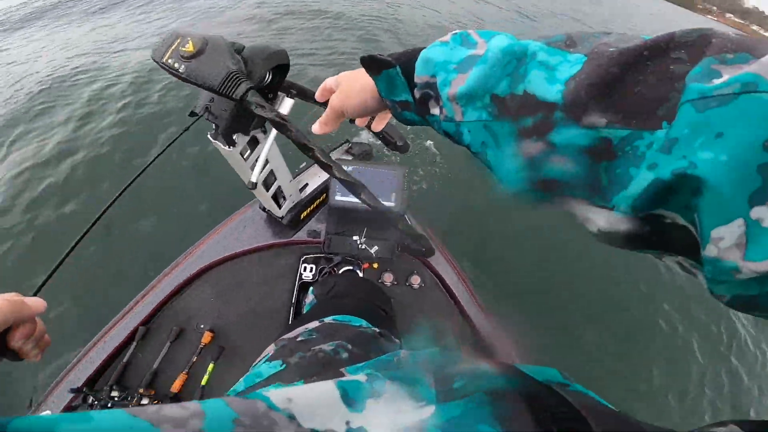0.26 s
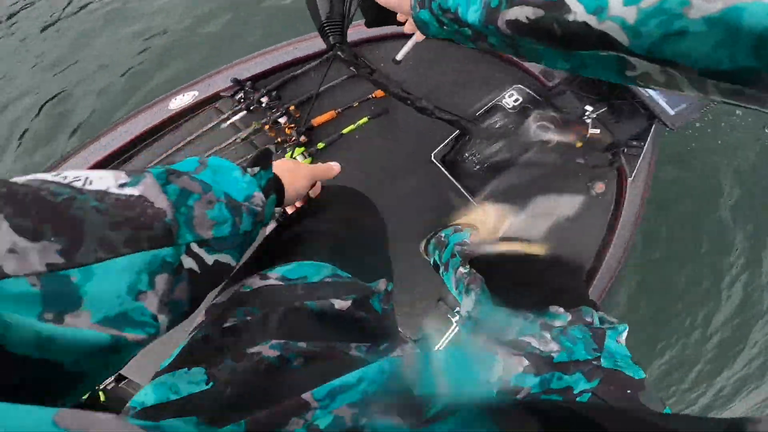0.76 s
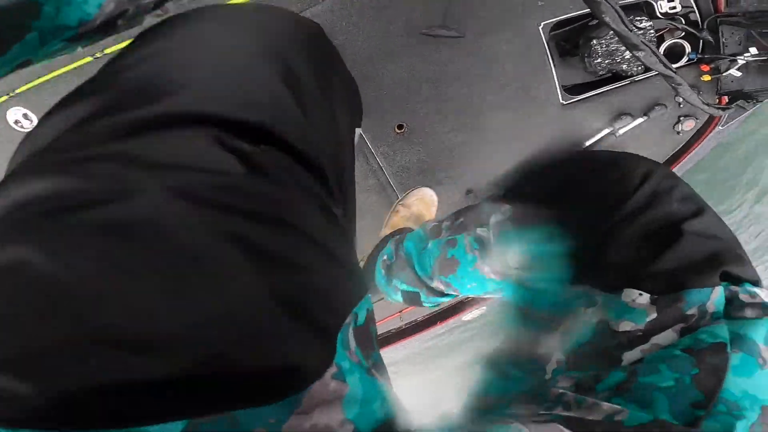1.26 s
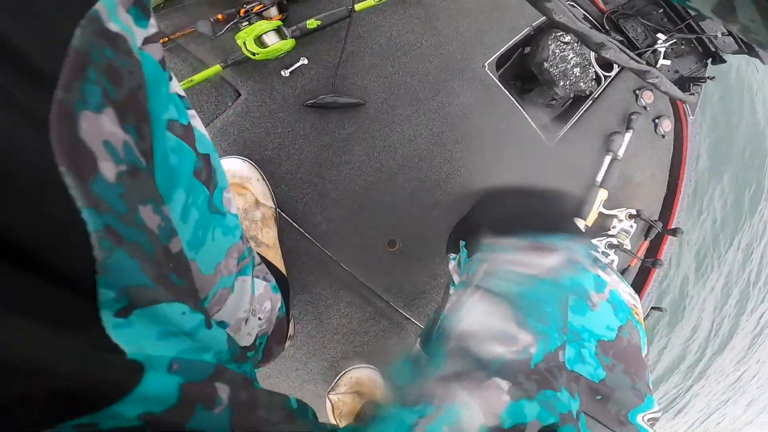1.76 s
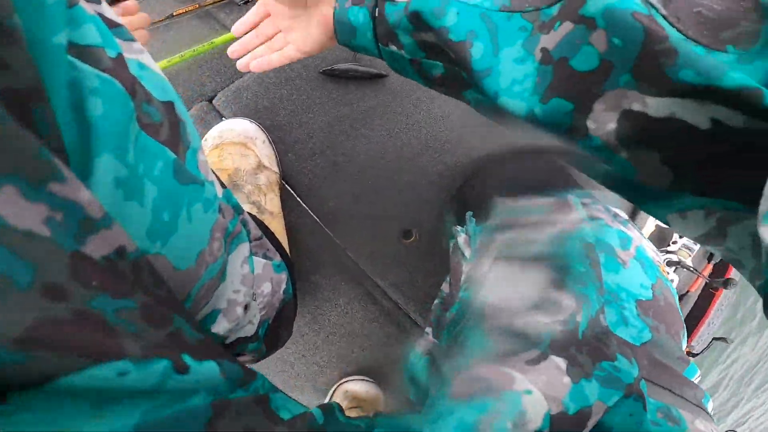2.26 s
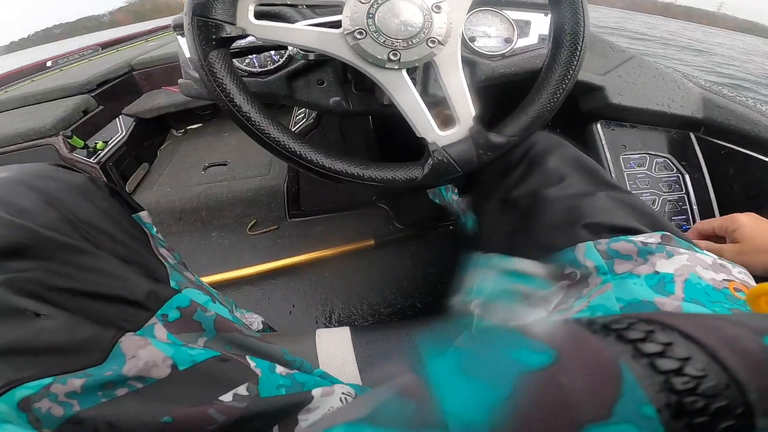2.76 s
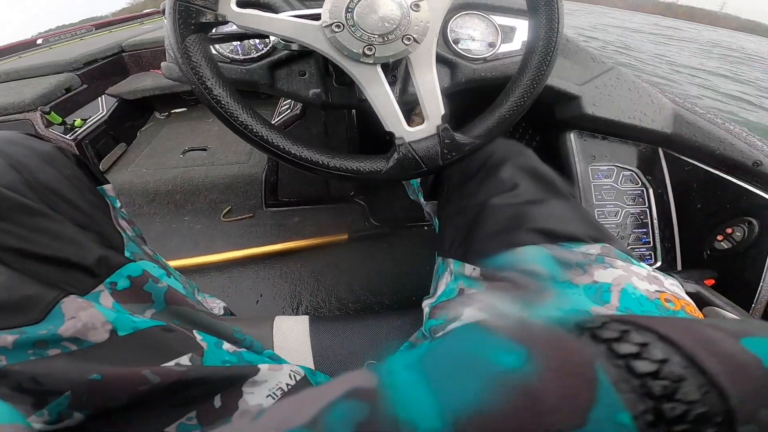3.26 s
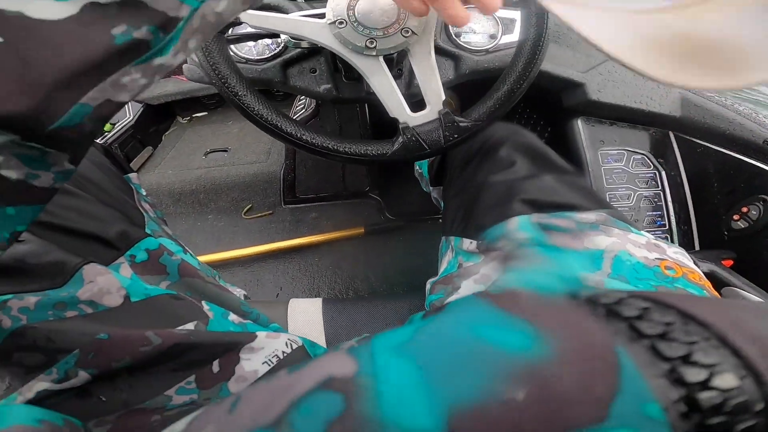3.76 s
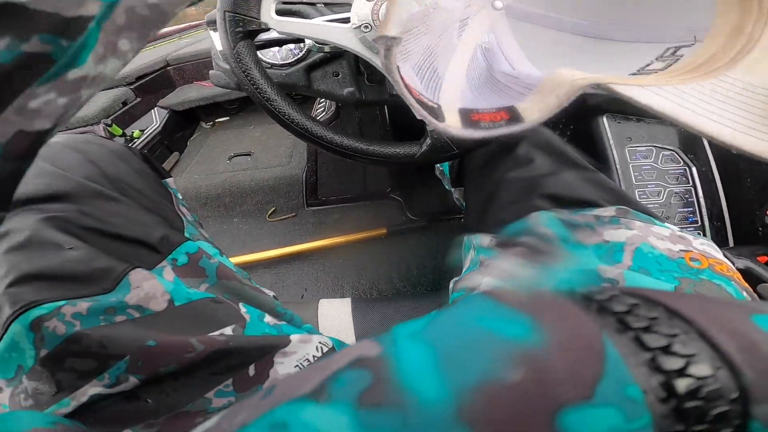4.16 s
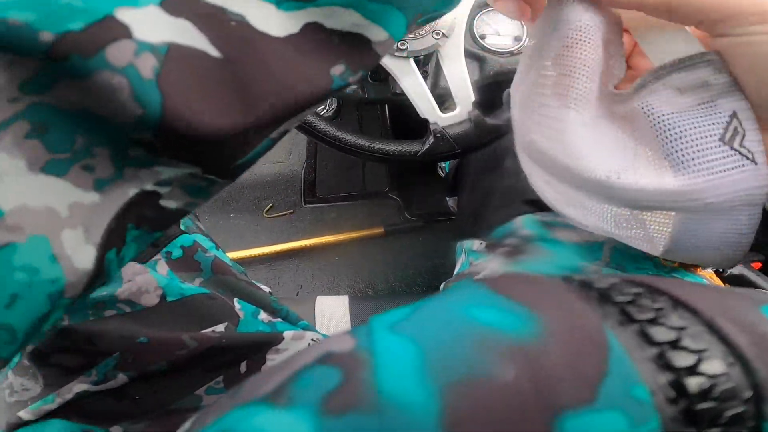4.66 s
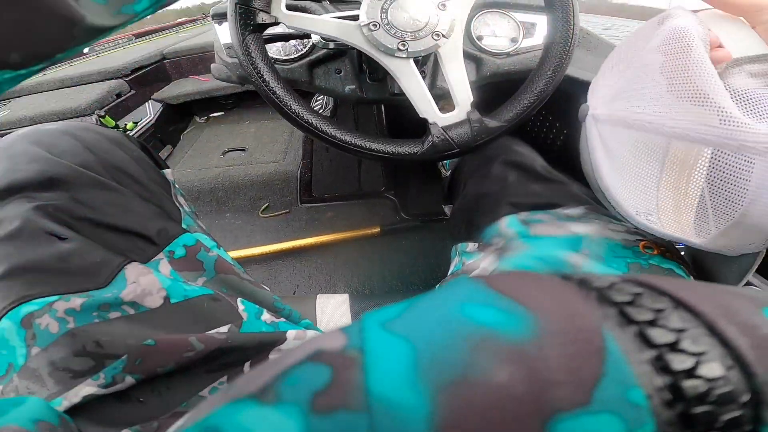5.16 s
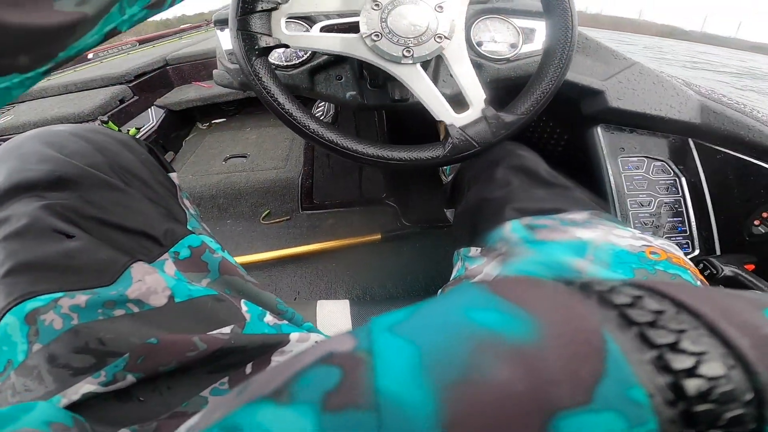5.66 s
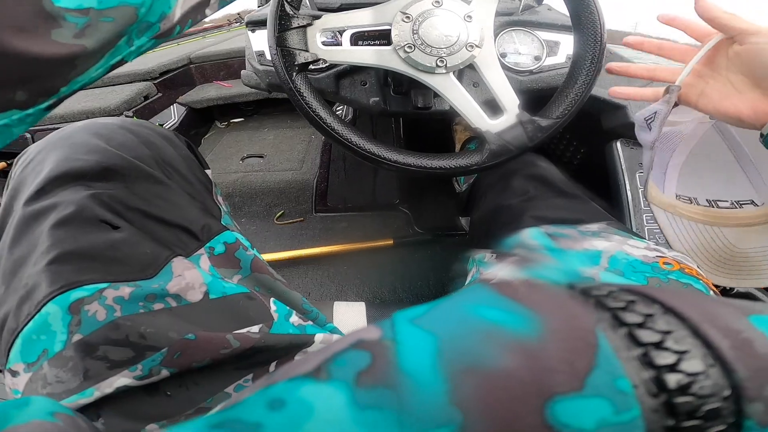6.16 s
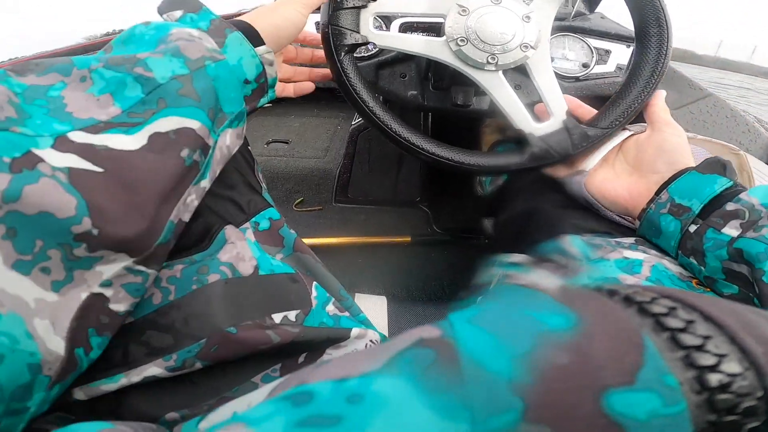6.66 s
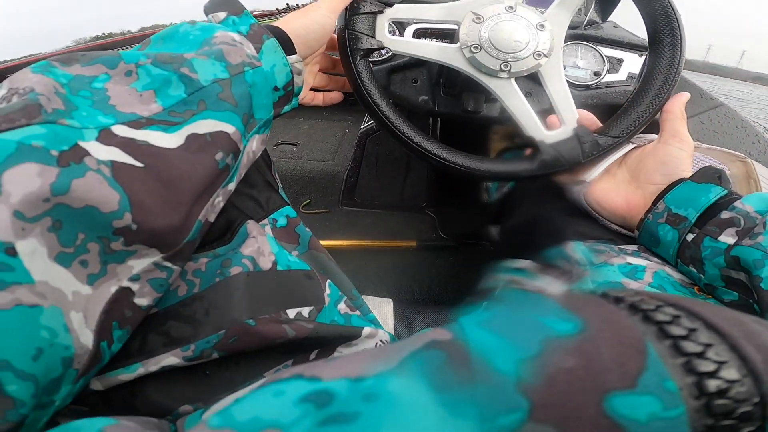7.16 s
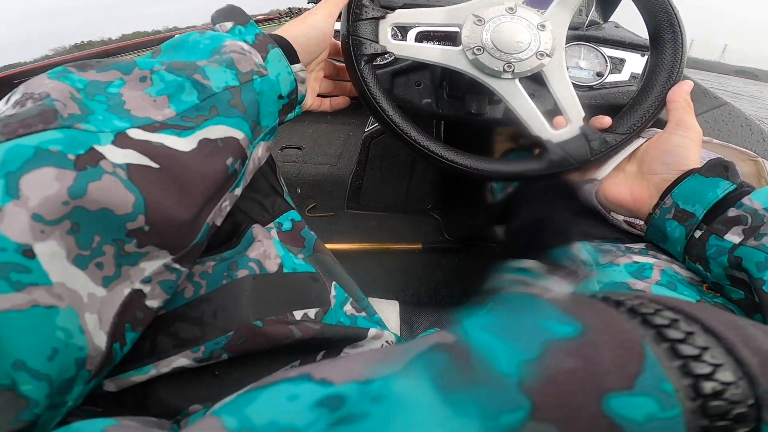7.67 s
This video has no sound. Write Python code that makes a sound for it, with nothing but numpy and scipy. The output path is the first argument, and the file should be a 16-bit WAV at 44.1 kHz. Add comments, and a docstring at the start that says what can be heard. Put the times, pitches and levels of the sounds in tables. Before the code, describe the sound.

Heard from the driver's chest in stereo on a boat on open water. From 0 to 0.5 s, light clacks and low hull knocks under close jacket rustle and a faint hum. At 0.52 s a hard bright clack starts a dense clatter until about 0.9 s, with heavy hollow thumps, short gritty scrapes and rattling loose gear. Another deep thump lands near 1.3 s, then mostly cloth rustle and a sharp knock at 2.1 s. Between 2.35 and 2.75 s he drops into the seat with booming thuds and console knocks. From 3.2 to 3.8 s the outboard sweeps up quickly with a brief intake whine and low shudder, then holds a throbbing hum. From 4.5 to 5.1 s it surges again, harder and brighter, then creeps higher into a steady drone, with growing wind, hull rumble and wash. Small ticks occur near 5.9 and 7.4 s; it is still running at the end.

```python
"""A fibreglass fishing boat on a lake, heard by a stereo microphone on the driver's chest.
First the bow motor is stowed: ringing modes make clacks and hull thumps, with gritty scrapes and a faint hum.
He steps down and sits with knocks of the console, his jacket rustling in bursts of crackling noise.
Then the six-cylinder outboard speeds up in two steps: firing tones and propeller throb sweep through
hull resonances over an intake whine, while noise of wind, hull rumble and wash grows with engine speed."""
import sys
import numpy as np
from scipy import signal
from scipy.fft import rfft, irfft, next_fast_len
from scipy.io import wavfile

SR = 44100
rng = np.random.default_rng(int(sys.argv[2]) if len(sys.argv) > 2 else 0)


def digitize_waveform(pressure):
    """Quantize a signal to 16-bit integers and store it at the path in sys.argv[1].

    Rows of a 2-D input are taken as channels; values are limited to [-1, 1].
    """
    field = np.atleast_2d(pressure).T
    bounded = np.clip(field, -1, 1)
    quanta = np.round(bounded * 32767).astype(np.int16)
    wavfile.write(sys.argv[1], SR, quanta)


N = 348831
TIME = np.arange(N) / SR

# How much the two microphone ports differ: (frequency [Hz], side minus mid [dB])
PORT_WIDTH = [(30, -20), (80, -29), (160, -33), (350, -20.5), (700, -9), (1400, -6.5), (2800, -3),
              (5000, 0.5), (12000, 0)]
PORT_LAG = 4  # samples by which the left port hears boat and engine later
TOP_HZ = 15300  # upper limit of the microphone chain

# Two faint tones aboard:
# (time [s], lower tone [Hz], its level [dB], upper tone [Hz], its level [dB])
HUM_TONES = [(0, 121.1, -34.5, 292, -34.5), (.5, 126.4, -35, 291.5, -37), (1.05, 128, -43, 282.7, -50),
             (1.55, 101, -41, 284, -48.5), (2.0, 105.8, -44.5, 247.5, -41.5), (2.4, 110, -29.5, 281, -39),
             (2.95, 111.1, -40, 278.3, -38.5), (3.3, 112.5, -34.5, 270, -47)]

# Noise colours of wind on the ports, drumming hull and wash: (frequency [Hz], relative level [dB])
BUFFET_SPECTRUM = [(12, -13), (24, -8), (36, -2.5), (55, -3.5), (90, -5.5), (200, -34.5)]
RUMBLE_SPECTRUM = [(30, -12.5), (60, -7.5), (110, -1), (180, -1), (250, -4), (330, -6), (450, -9.5),
                   (530, -20.5), (800, -27.5), (1400, -39)]
WASH_SPECTRUM = [(250, -10.5), (500, 7), (700, 6), (930, 2), (1150, -1.5), (1450, -3.5), (1850, -11.5),
                 (2600, -15), (3200, -16), (3500, -15), (3900, -19.5), (5000, -24.5), (8000, -35.5)]
UNDER_WAY_HZ = 47.7  # firing rate above which the boat gathers way
# Noises that grow with speed: (relative level until under way [dB], gain per octave of engine speed [dB])
BUFFET_LAW = (-43, 8.6)
RUMBLE_LAW = (-42.5, 6.07)
WASH_LAW = (-52.5, 7.25)
FLUTTER_LAW = (-73.5, 7.3)  # the jacket in the headwind
FLUTTER_PAN_DB = 5.5  # left minus right
# Low rumble and soft wash swell as the driver moves, later as the boat runs:
# (middle [s], length [s], low buffet, rumble, wash: relative levels [dB])
NOISE_SWELLS = [(0.204, 0.86, -60, -35, -46), (0.716, 0.33, -27, -40, -42.5), (2.16, 0.58, -64, -38.5, -47),
                (2.473, 0.24, -44, -27, -41.5), (2.798, 0.9, -31.5, -40.5, -49),
                (3.671, 0.49, -29, -32, -46), (4.056, 1.8, -45, -40.5, -46), (4.636, 0.39, -36, -39, -43.5),
                (5.601, 1.5, -39.5, -27.5, -62), (6.95, 0.2, -30.5, -34, -45),
                (7.756, 0.53, -44, -48, -39.5)]
# The hull shudders as the propeller bites: (middle [s], length [s], frequency [Hz], level [dB])
SHUDDER = (3.5, 0.2, 34, -15.5)

# Colour of the jacket's rustle: (frequency [Hz], relative level [dB])
RUSTLE_SPECTRUM = [(290, -30), (500, 12), (665, -9), (714, -17.5), (766, -0.5), (871, -10.5), (1210, 1.5),
                   (1500, -3.5), (1630, -3.5), (2720, -4), (6860, -12), (13600, -31), (15000, -45)]
# Arms and body moving in the jacket:
# (middle [s], length [s], relative rustle level [dB], left minus right [dB])
JACKET_MOVES = [(0.197, 0.67, -44, 1.5), (0.726, 0.22, -41.5, 1), (0.947, 0.12, -44, 7.5),
                (1.064, 0.067, -46.5, 8), (1.254, 0.24, -42.5, 3), (1.518, 0.27, -50, 5),
                (1.763, 0.3, -44, 4), (2.05, 0.32, -48.5, 3), (2.268, 0.21, -43, 5),
                (2.536, 0.054, -45, -5), (2.7, 0.55, -53, 5.5), (3.425, 0.45, -54.5, 2.5),
                (3.728, 0.34, -48.5, 7.5), (4.352, 0.23, -56.5, 11), (5.018, 0.11, -51.5, 9.5),
                (5.19, 0.26, -50.5, 8.5), (5.85, .6, -59, 1.5), (6.492, 0.41, -54, 3),
                (6.714, 0.2, -47.5, 5), (7.75, 0.62, -63, 4)]

# Ringing modes of hard fittings, seat and console, hull and deck:
# (frequency [Hz], relative level [dB], t60 [s])
FITTING_MODES = [(547, 16.5, 0.021), (774, 14, 0.012), (947, -5.5, 0.073), (1470, 2.5, 0.019),
                 (1680, -8, 0.019), (2180, -8.5, 0.018), (2490, -6, 0.02), (3020, 1, 0.026),
                 (3330, -3, 0.017), (4480, 11, 0.0059), (4770, -2.5, 0.03), (6920, -9, 0.029),
                 (7620, -27, 0.015), (9650, -9.5, 0.045)]
CONSOLE_MODES = [(800, 7, 0.066), (897, 6, 0.068), (1240, -0.5, 0.064), (1400, -5, .035), (2300, -8, 0.031),
                 (2700, -10, 0.022), (3400, -4, 0.045), (4300, -8, 0.033)]
HULL_MODES = [(32.24, 4, 1), (57.5, -3.5, 1), (87.8, 0, 0.37), (115.6, -0.5, 0.15), (145.5, 4, 0.23),
              (188, -2, 0.41), (218.6, -1.5, 0.14), (277, 6, 0.082), (336, 2.5, 0.076), (397, -0.5, 0.13),
              (501, 2, 0.073), (599, -1.5, 0.071), (693, -14, 0.22)]
# Clacks and knocks, with a bright cloth tick and a few faint stray ticks:
# (time [s], peak level [dB], colour [Hz], ring length [share of t60], pitch [factor])
CLACKS_AND_TICKS = [(.092, -23, 1070, .6, 1.2), (.311, -15, 1630, 1.7, 0.93), (.39, -27, 1400, 1.3, 1.03),
                    (.449, -29, 5100, 1, 1), (.520, -4.5, 1650, 1, 1), (.5222, -11, 2890, 0.66, 1),
                    (.5235, -23, 1510, 0.6, 1.2), (.5637, -16, 950, 0.55, 0.88),
                    (.598, -18.5, 644, 1.5, 0.95), (.604, -21, 1600, 0.95, 1.3),
                    (.6246, -7.5, 1360, 1.6, .93), (.627, -18, 2100, .6, 0.8),
                    (.6365, -10.5, 3380, 0.33, 1.02), (.6435, -25, 3600, .7, 1.2),
                    (.650, -21, 2300, .7, 0.93), (.655, -23, 1800, .8, 0.89), (.668, -22, 1160, 1, 0.87),
                    (.671, -26, 4500, .8, 1.05), (.696, -19.5, 1570, 2.9, 0.96), (.707, -32, 750, 1, 1.1),
                    (.7265, -20, 3300, 0.45, 1.2), (.729, -27, 1300, .77, 1.1), (.741, -14, 2700, .8, 1.4),
                    (.7445, -21, 4300, .7, 1), (.751, -16, 1800, 1.2, 0.94), (.762, -14, 1600, 1.6, 1),
                    (.785, -23, 593, .9, 0.62), (.808, -24, 1760, 1.6, 0.96), (.811, -31, 4400, 0.92, 1.23),
                    (.827, -32, 2600, 0.99, 0.74), (.8445, -30, 3480, 1, 1.15),
                    (.848, -21, 1700, 1.5, 1.12), (.904, -21, 1220, 1.2, .95), (1.105, -27, 990, 1, 1.1),
                    (1.1705, -31, 7000, 0.72, 1.08), (1.237, -22.5, 1120, 1.8, 1.14),
                    (1.285, -20, 2300, 0.75, 0.85), (1.369, -32, 3740, .9, 1.2),
                    (1.432, -34, 1700, 0.63, 1.4), (1.794, -23, 1210, 0.58, 1.05),
                    (2.098, -17, 1030, .22, 1.2), (2.1027, -7, 1360, 0.21, 0.73),
                    (4.956, -30, 1110, 0.66, 0.76), (5.87, -24.5, 1090, 0.61, 0.8),
                    (7.3855, -24.5, 1648, 0.79, 1.12), (7.4424, -16.5, 1260, 0.64, 1.0)]
# Knocks as he drops into the seat, same columns:
# (time [s], peak level [dB], colour [Hz], ring length [share of t60], pitch [factor])
SEAT_KNOCKS = [(2.362, -21, 700, 0.62, 0.69), (2.373, -23, 1350, 1.2, 1.08), (2.464, -25, 900, 0.64, 1.15),
               (2.4898, -13.5, 800, 1.26, 1.03), (2.4965, -23, 1000, 0.43, 1.26), (2.539, -29, 3400, .8, 1),
               (2.7455, -19, 1970, 0.95, 1.02), (2.99, -30, 800, 0.78, 0.99)]
# Thumps on the hull: (time [s], peak level [dB], colour [Hz], ring length [share of t60])
HULL_THUMPS = [(.026, -13.5, 198, 0.57), (.24, -18.5, 225, 2.7), (.312, -13, 212, 0.52),
               (.529, -10, 100, 0.66), (0.601, -14.5, 140, 2.6), (.637, -9.5, 188, 0.93),
               (.647, -2.5, 172, 0.08), (.726, -3, 168, 0.37), (.738, -4, 190, 1.23), (.757, -8, 170, 1.1),
               (0.794, -4, 113, 0.76), (0.825, -7.5, 121, 0.29), (.855, -8.5, 85, 0.32),
               (1.285, -9, 203, 0.2), (1.289, -5, 75.5, 0.31), (1.312, -17, 150, 2), (1.36, -24, 200, 0.93),
               (1.391, -24, 330, 0.6), (1.424, -32, 600, 0.53), (2.105, -18, 79.5, 0.34),
               (2.348, -8.5, 368, 0.44), (2.361, -10, 605, 0.45), (2.375, -17, 380, 0.87),
               (2.493, -6.5, 148, 0.99), (2.511, -3, 45.3, 0.55), (2.555, -9, 55, 1.2),
               (2.746, -7, 214, 1.05)]
# Gritty scrapes that go with the blows: (time [s], level [dB], t60 [s], colour [Hz])
GRITTY_SCRAPES = [(0.636, -16.5, 0.068, 1800), (0.661, -34, 0.32, 900), (0.728, -16.5, 0.095, 890),
                  (0.743, -24, 0.058, 2520), (0.752, -27, 0.12, 1500), (0.806, -32.5, 0.12, 2200),
                  (1.168, -32.5, 0.08, 5660), (1.236, -27.5, 0.033, 5970), (1.286, -20, 0.11, 664),
                  (1.288, -32.5, 0.16, 4500), (1.305, -32.5, 0.28, 550), (2.141, -36, 0.044, 6860),
                  (2.344, -32.5, 0.27, 610), (2.367, -34, 0.19, 1120), (2.484, -33, 0.09, 1300),
                  (2.495, -29.5, 0.048, 2400), (2.518, -39, .05, 11000), (2.536, -30.5, 0.06, 3600),
                  (2.746, -34, 0.06, 2200)]
# Loose gear answering a thump: level against the thump, longest delay, middle colour
RATTLE_DB, RATTLE_S, RATTLE_HZ = -25.5, 0.079, 2200

# Engine speed: (time [s], firing rate [Hz])
ENGINE_SPEED = [(3.1, 30.83), (3.2, 33), (3.34, 46.63), (3.42, 52.43), (3.48, 61.2), (3.54, 66.1),
                (3.63, 78.97), (3.72, 90.84), (3.8, 95.6), (3.97, 94.94), (4.2, 93.3), (4.45, 93.5),
                (4.57, 96.8), (4.66, 103.6), (4.75, 110.3), (4.83, 116.1), (4.91, 123.1), (5.07, 136.1),
                (5.2, 139), (5.39, 140.3), (5.55, 144.9), (5.71, 146.6), (6.03, 148.8), (6.19, 157.3),
                (6.58, 165.6), (6.88, 170), (7.04, 173.8), (7.3, 175.7), (7.56, 180.4), (7.75, 180.6),
                (7.91, 182.5)]
# Load on the drive, from going into gear to open throttle: (time [s], load [dB])
DRIVE_LOAD = [(2.3, -48), (2.6, -5), (3.08, -8), (3.2, -6), (3.5, -3), (3.7, -1)]
# Pushes of the throttle, which harden the exhaust note: (middle [s], length [s], push [dB])
THROTTLE_PUSHES = [(3.872, 0.36, 3), (4.405, 0.23, 5), (4.797, 0.1, 7), (5.034, 0.26, 13.5)]
CYLINDERS = 6
BLADES_PER_FIRING = 4 / 7  # blade passes per firing
# Harmonics of the firing rate: (multiple [of the firing rate])
FIRING_MULTIPLES = (1, 2, 3, 4, 5, 8, 10, 12)
# Each of those multiples: (strength [dB], share of a push [factor], loss per dB of lighter load [dB])
FIRING_STRENGTHS = [(1.5, 0, 0.52), (-3, 0.41, 1.84), (-11.5, 1, 2.5), (-5, 1, 1.2), (-14, .6, 6),
                    (-6.5, 0.54, 6.5), (-15.5, 0, 5.5), (-6.5, .4, 6)]
# Resonances of hull and cowling that the firing tones climb through:
# (centre [Hz], half width [Hz], level [dB])
HULL_BOOMS = [(35.4, 7.1, -19), (82.2, 8.7, -19), (93.7, 1.4, -26), (132.2, 9.5, -18), (172.1, 16.7, -14),
              (212, 26, -19.5), (339.5, 15, -21.5), (383.4, 10, -23.5), (410.3, 15, -22.5),
              (444, 12, -15.5), (467.4, 6, -19.5), (650.1, 6.9, -35), (693.4, 26, -27), (735, 9, -30.5),
              (757.8, 10, -21), (925, 35, -31.5), (1140, 19, -30.5), (1350, 50, -37.5), (1448, 12, -31.5),
              (1797, 48, -41)]
# Slow flexing of the hull, shaken by the propeller blades: (centre [Hz], half width [Hz], level [dB])
HULL_FLEXES = [(33, 8, -29), (64.4, 6.2, -17), (80.6, 4.9, -24), (85, 3.8, -17.5), (98.9, 2.2, -28)]
# What the hull passes on of the uneven firing: (frequency [Hz], gain [dB])
HULL_PATH = [(28, -5), (50, -7), (80, 1), (96, 13), (112, -3), (125, -3.5), (152, -1), (174, 14.5),
             (198, 2.5), (245, 1), (315, -6), (385, 0.5), (425, -7.5), (462, -0.5), (490, -8.5), (540, -23),
             (640, -18), (830, -21.5), (912, -11), (950, -20.5), (1000, -18), (1040, -18.5), (1130, -25),
             (1500, -35.5), (2000, -30)]
UNEVEN_DB, UNEVEN_PER_LOAD = -36, 3.06  # cylinder unevenness at 0 dB load; its dB per dB of load
# Whine of the air intake; its resonance rises as the throttle opens:
# (time [s], level [dB], resonance centre [Hz])
INTAKE_WHINE = [(2.3, -50, 937), (2.5, -42, 923), (2.8, -46.5, 948), (3.24, -50, 961), (3.34, -34, 932),
                (3.45, -37.5, 967.3), (3.68, -34.5, 986), (3.95, -55, 1015), (4.4, -62, 994)]
INTAKE_WIDTH_HZ = 32  # half width of the intake resonance
INTAKE_NOISE_DB, ONE_BANK_DB = -16, -11  # rushing air, and lines of one cylinder bank, against firing lines


def undb(db):
    """Decibels to gain."""
    return 10 ** (np.asarray(db) / 20)


def unit(x):
    """Scale to rms 1."""
    return x / np.sqrt(np.mean(x ** 2))


def curves(table):
    """The columns of a table, joined by straight lines in time."""
    s, *columns = np.transpose(table)
    return [np.interp(TIME, s, column) for column in columns]


def response(hz, points):
    """Gain of a drawn spectrum; it falls steeply beyond the ends."""
    f, db = np.transpose(points)
    octaves_outside = np.abs(np.log2((hz + 1) / np.clip(hz + 1, f[0], f[-1])))
    return undb(np.interp(np.log(hz + 1), np.log(f), db) - 20 * octaves_outside)


def focus(hz, centre_hz, octaves):
    """A rounded peak that favours the frequencies near one colour."""
    return 1 / (1 + (np.log2((hz + 1) / centre_hz) / octaves) ** 2)


def resonances(hz, peaks):
    """Gain of a set of resonances along a slowly moving frequency."""
    coarse = hz[::32]  # slow enough to work out every 32nd sample
    power = 0
    for centre, width, db in peaks:
        power = power + (undb(db) / (1 + ((coarse - centre) / width) ** 2)) ** 2
    return np.interp(TIME, TIME[::32], np.sqrt(power))


def walk(rate):
    """Smooth random wander with a spread near 1, drawn at rate points per second."""
    steps = rng.standard_normal(int(N / SR * rate) + 2)
    fine = signal.resample_poly(steps, 8, 1)
    return np.interp(TIME * rate, np.arange(len(fine)) / 8, fine)


def swell(s, length):
    """A rounded rise and fall about time s, at half height over its length."""
    edge = (2 * (TIME - s) / length) ** 2
    return 1 / (1 + edge ** 2)


def pan(db):
    """Left and right gains for a level difference, left minus right."""
    return undb(np.array([[.5], [-.5]]) * db)


def from_right(sound):
    """Delay the left port by a few samples, so that the right one leads."""
    return np.array([np.pad(sound[0], (PORT_LAG, 0))[:N], sound[1]])


def noise(shape, size=N, grain_db=0, wider_db=0):
    """Stereo noise of rms 1; shape gives its gain by frequency, grain_db makes it crackle."""
    n = next_fast_len(size)
    hz = np.fft.rfftfreq(n, 1 / SR)
    grain = undb(grain_db * np.minimum(rng.exponential(size=n), 8))
    mid, side = rfft(rng.standard_normal((2, n)) * grain)
    side = side * response(hz, PORT_WIDTH) * undb(wider_db)
    ports = np.array([mid + side, mid - side])
    return unit(irfft(ports * shape(hz), n)[:, :size])


def with_speed(law):
    """Gain of a noise that grows with engine speed once the boat is under way."""
    hz, = curves(ENGINE_SPEED)
    start_db, db_per_octave = law
    return undb(start_db + db_per_octave * np.log2(np.maximum(hz / UNDER_WAY_HZ, 1)))


def add(out, s, sound):
    """Mix a sound in at time s."""
    i = max(int(s * SR), 0)
    out[:, i:i + sound.shape[-1]] += sound[..., :N - i]


def hum():
    """Two faint sine tones that waver in pitch and level."""
    low_hz, low_db, high_hz, high_db = curves(HUM_TONES)
    tones = 0
    for hz, db in ((low_hz, low_db), (high_hz, high_db)):
        gain = undb(db + 4.0 * walk(11))
        tones = tones + gain * np.sin(2 * np.pi * np.cumsum(hz * (1 + .01 * walk(15))) / SR)
    return np.sqrt(2) * tones


def ride(phase):
    """Low buffet, rumble and exhaust-pulsed wash: noises that grow with engine speed and swell now and then."""
    power = np.array([with_speed(law) for law in (BUFFET_LAW, RUMBLE_LAW, WASH_LAW)]) ** 2
    for s, length, *levels_db in NOISE_SWELLS:
        power += np.outer(undb(levels_db), swell(s, length)) ** 2
    wind, hull, water = np.sqrt(power)

    buffet = noise(lambda hz: response(hz, BUFFET_SPECTRUM), wider_db=4)
    buffet = buffet * wind * undb(0.5 + 1.7 * walk(5.2)) * pan(2.5)

    rumble = noise(lambda hz: response(hz, RUMBLE_SPECTRUM))
    rumble = rumble * hull * undb(4.0 + 1.8 * walk(12)) * pan(1.7)

    wash = noise(lambda hz: response(hz, WASH_SPECTRUM), grain_db=2.0)
    exhaust_pulse = 1 + 0.057 * np.sin(phase)
    wash = wash * water * undb(3.0 + 0.62 * walk(22)) * exhaust_pulse
    return buffet + rumble + wash


def shudder():
    """A low hull tone swells and dies away as the propeller bites."""
    s, length, hz, db = SHUDDER
    phase = 2 * np.pi * np.cumsum(hz * (1 + 0.033 * walk(4.7))) / SR
    return np.sqrt(2) * undb(db) * swell(s, length) * np.sin(phase)


def jacket():
    """Waterproof cloth slides with each movement and flutters in the headwind; octave bands hiss, creases tick."""
    power = (with_speed(FLUTTER_LAW) * pan(FLUTTER_PAN_DB)) ** 2
    for s, length, db, pan_db in JACKET_MOVES:
        power += (undb(db) * pan(pan_db) * swell(s, length)) ** 2

    slide = 0
    for fold_hz in 1000 * 2 ** np.arange(5):  # each fold hisses and wavers in its own octave
        fold = noise(lambda hz: response(hz, RUSTLE_SPECTRUM) * focus(hz, fold_hz, 1.0) ** 2, grain_db=2.0)
        fold_gain = response(fold_hz, RUSTLE_SPECTRUM) * np.sqrt(fold_hz)
        slide += fold * fold_gain * undb(2.8 * walk(35))
    creases = noise(lambda hz: response(hz, RUSTLE_SPECTRUM) * np.sqrt(hz + 1), grain_db=4.1)
    cloth = unit(slide) + undb(-7.5) * creases
    return cloth * np.sqrt(power) * undb(2.0 + 0.35 * walk(25))


def scrapes():
    """Short gritty bursts from soles, cables and loose gear: crackling noise that dies away."""
    out, t = np.zeros((2, N)), TIME[:SR // 3]
    for s, db, t60, colour_hz in GRITTY_SCRAPES:
        def grit(hz):
            return focus(hz, colour_hz, 1.07) / np.sqrt(hz + 300) / (1 + (hz / 9000) ** 4)
        burst = noise(grit, size=len(t), grain_db=2.0)
        envelope = np.exp(-np.log(1000) * t / t60) * (1 - np.exp(-t / 0.00032))
        add(out, s, burst * undb(db) * envelope)
    return out


def rattles(count=6):
    """Rods and tackle of all sizes tick at random just after each thump, weaker the later they land."""
    chance = rng.random((len(HULL_THUMPS), count, 3))
    ticks = []
    for (s, db, *_), draws in zip(HULL_THUMPS, chance):
        for late, colour, size in draws:
            tick_hz = RATTLE_HZ * 2 ** (2 * colour - 1)
            pitch = 2 ** (0.654 * (size - .5))
            ticks.append((s + RATTLE_S * late, db + RATTLE_DB - 5 * late, tick_hz, 1, pitch))
    return ticks


def blows(events, modes, octaves, contact_s, scatter):
    """Each blow rings one object's modes, briefly when it is held; the two ports catch them differently."""
    out, t = np.zeros((2, N)), TIME[:SR // 2]
    hz, db, t60 = np.transpose(modes)
    t = t[t < 1.5 * t60.max()]
    for s, peak_db, colour_hz, length, pitch in events:
        detune, skew = rng.standard_normal((2, len(hz)))
        spin = 2j * np.pi * hz * pitch * (1 + scatter * detune)
        decay = np.log(1000) / (t60 * max(length, .05))
        rings = np.exp(np.outer(spin - decay, t))
        # neighbouring groups of three modes start with opposite sign
        weight = undb(db) * focus(hz * pitch, colour_hz, octaves) * (-1) ** (np.arange(len(hz)) // 3)
        # the phase difference between the ports grows with frequency
        ports = weight * np.exp(1j * np.outer([1, -1], skew * np.sqrt(hz / 25000)))
        ring = (ports @ rings).imag * (1 - np.exp(-t / contact_s))
        add(out, s, ring * undb(peak_db) / np.abs(ring).max())
    return out


def intake(phase):
    """Harmonics of the cylinders' gulps rise through the intake resonance, over a little rushing air."""
    hz, = curves(ENGINE_SPEED)
    level_db, centre_hz = curves(INTAKE_WHINE)
    whine = 0
    for k in range(12, 68):  # half multiples of the firing rate; odd k come from one bank
        gain = resonances(k / 2 * hz - centre_hz, [(0.0011, INTAKE_WIDTH_HZ, 0)])
        gain = gain * undb(ONE_BANK_DB * (k % 2))
        whine += gain * np.sin((k / 2 * phase + rng.uniform(0, 2 * np.pi)).astype(np.float32))
    air = noise(lambda f: focus(f, centre_hz.mean(), 0.046)) * undb(INTAKE_NOISE_DB)
    started = TIME > INTAKE_WHINE[0][0]
    return (whine + air) * undb(level_db + 1.2 * walk(20)) * started


def line_db(k):
    """Strength of multiple k of the engine cycle: the more cylinders agree, the stronger."""
    if k % CYLINDERS == 0:
        return 4.0
    if k % (CYLINDERS // 2) == 0:
        return 2.5
    if k % 2 == 0:
        return .4
    return -3.0


def outboard():
    """Firing tones, weaker lines of the six-cylinder cycle and propeller throb boom through resonances."""
    hz, = curves(ENGINE_SPEED)
    load_db, = curves(DRIVE_LOAD)
    push_db = sum(db * swell(s, length) for s, length, db in THROTTLE_PUSHES)
    phase = 2 * np.pi * np.cumsum(hz * (1 + 0.0014 * walk(25))) / SR
    opposite_ports = np.array([[1], [-1]])
    port_skew = 0.055 * walk(2.99) * opposite_ports

    firing = 0
    for k, (db, push_share, load_share) in zip(FIRING_MULTIPLES, FIRING_STRENGTHS):
        waver_db = min(0.3 + 0.51 * k, 2.0) * walk(14)
        level_db = db + push_share * push_db + load_share * load_db + waver_db
        firing += resonances(k * hz, HULL_BOOMS) * undb(level_db) * np.sin(k * (phase + port_skew))
    # the firing tones tremble once per engine cycle
    firing = firing * (1 + 0.15 * np.sin(phase / CYLINDERS + 0.34 * walk(9.9)))

    # unequal cylinders fill in lines between the firing tones; the hull's path shapes each
    cycle_lines = 0
    for k in range(4, 76):
        multiple = k / CYLINDERS
        if multiple not in FIRING_MULTIPLES:
            coarse_gain = response(hz[::64] * multiple, HULL_PATH) * undb(line_db(k))
            gain = np.repeat(coarse_gain, 64)[:N]
            sway = 1 + .35 * walk(8)
            line_phase = multiple * phase + rng.uniform(0, 2 * np.pi)
            cycle_lines += gain * sway * np.sin(line_phase.astype(np.float32))
    uneven = undb(UNEVEN_DB + UNEVEN_PER_LOAD * load_db + 0.29 * push_db) * cycle_lines

    throb_gain = resonances(BLADES_PER_FIRING * hz, HULL_FLEXES) * undb(load_db + 1.8 * walk(12))
    throb_wander = 0.085 * walk(10) + 0.34 * walk(2.9) * opposite_ports
    propeller = throb_gain * np.sin(BLADES_PER_FIRING * phase + throb_wander)

    sound = np.sqrt(2) * (firing + propeller + uneven)
    return sound * pan(np.interp(TIME, [5.5, 6.8], [1.0, 2.3])), phase


def scene():
    """Engine, water, hull and driver together."""
    engine, phase = outboard()
    boat = from_right(engine + ride(phase) + intake(phase) + shudder() + hum())
    clacks = blows(CLACKS_AND_TICKS + rattles(), FITTING_MODES, octaves=0.36, contact_s=0.00032, scatter=0.022)
    knocks = blows(SEAT_KNOCKS, CONSOLE_MODES, octaves=0.46, contact_s=0.00055, scatter=0.011)
    thump_events = [(*row, 1) for row in HULL_THUMPS]  # pitch factor 1
    thumps = blows(thump_events, HULL_MODES, octaves=0.72, contact_s=0.0014, scatter=0.0273)
    return boat + jacket() + (clacks + knocks + scrapes()) * pan(-1.0) + thumps * pan(0.29)


def record(dry):
    """The microphone chain drops the deepest rumble, rounds the highest peaks and cuts the top."""
    dry = signal.sosfilt(signal.butter(2, 18, "high", fs=SR, output="sos"), dry)
    rounded = dry / (1 + (dry / .8) ** 6) ** (1 / 6)
    return signal.sosfilt(signal.ellip(8, .2, 80, TOP_HZ, fs=SR, output="sos"), rounded)


dry = scene()
out = record(dry)
digitize_waveform(out)
```